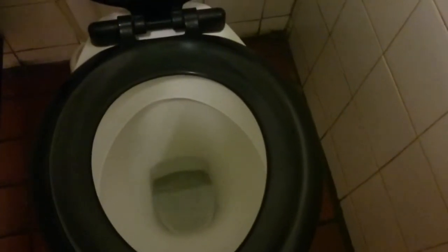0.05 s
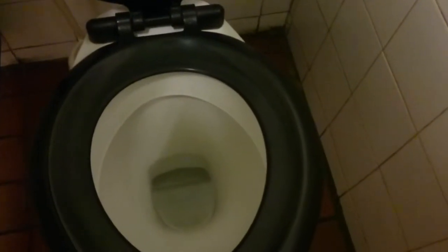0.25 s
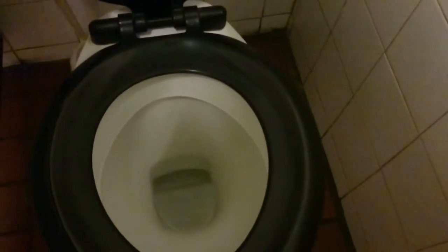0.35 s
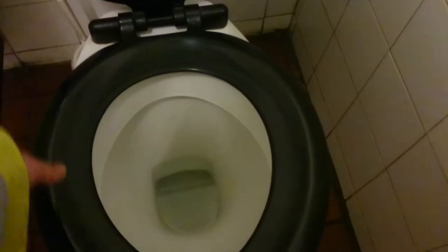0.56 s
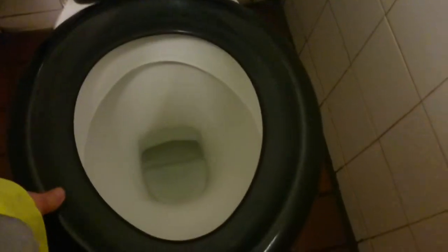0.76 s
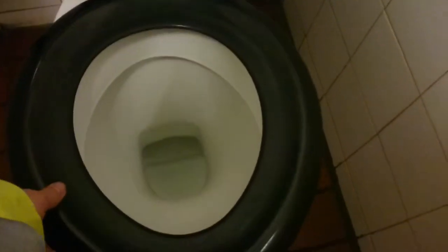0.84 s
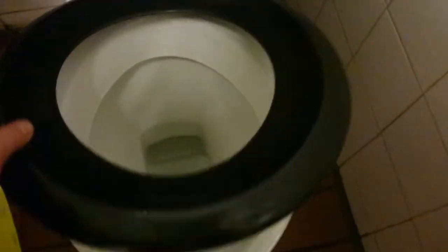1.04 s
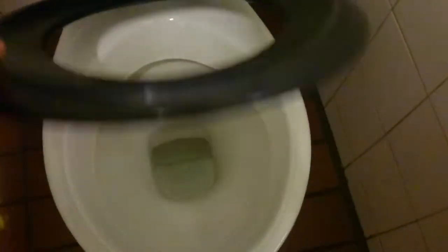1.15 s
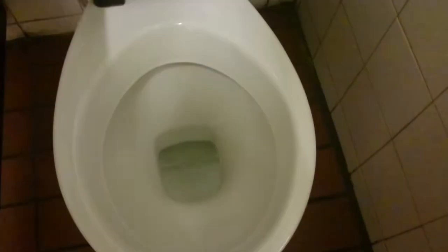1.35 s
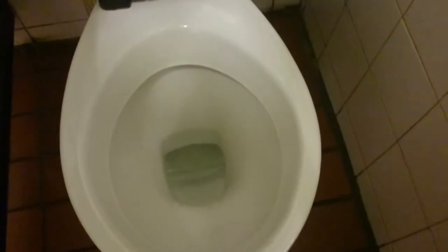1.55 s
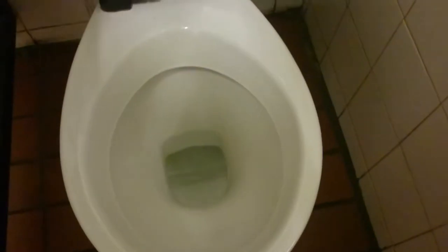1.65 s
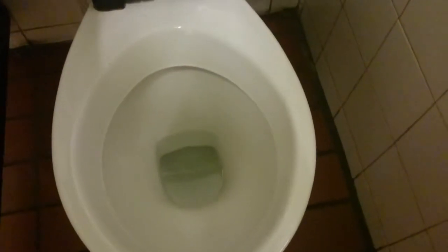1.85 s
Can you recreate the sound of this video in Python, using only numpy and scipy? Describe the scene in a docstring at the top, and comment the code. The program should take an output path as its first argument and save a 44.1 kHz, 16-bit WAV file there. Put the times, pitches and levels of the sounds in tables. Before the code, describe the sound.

A plastic toilet lid gives a hard, bright clack at about 0.2 seconds, ringing the hollow bowl and echoing off tiles for half a second. A hand bumps the seat dully near 0.6. The hinges click just before the seat knocks, softer and duller, at 1.0. Soft close taps come around 1.5 seconds. A jacket sleeve swishes faintly throughout, over quiet room noise and low rumble.

```python
"""A raised plastic toilet lid is knocked, then the seat knocks against its stop, in a small tiled bathroom.
Each knock is a hard clack that rings the plastic and the hollow bowl; the tiles answer for half a second.
The hand bumps the seat, the hinges click, a few soft taps sit up close and a jacket sleeve swishes with
the arm, over faint room tone and rumble. It is all heard through two microphone ports with different
resonances and opposite polarity."""
import sys
import numpy as np
from scipy import signal
from scipy.fft import rfft, irfft, next_fast_len
from scipy.io import wavfile
from scipy.ndimage import map_coordinates

SR = 44100
rng = np.random.default_rng(int(sys.argv[2]) if len(sys.argv) > 2 else 0)


def wav_record(signal):
    """Record a signal, one row per channel, as 16-bit PCM in the file named by sys.argv[1]."""
    frames = np.transpose(np.atleast_2d(signal))
    bounded = np.clip(frames, -1, 1)
    # unit amplitude maps onto the largest positive 16-bit level
    quanta = np.round(bounded * 32767).astype(np.int16)
    wavfile.write(sys.argv[1], SR, quanta)


N = 83790
T = np.arange(N) / SR


# lid hit, then seat hit: t/s, clack/dB, crack/dB, plastic ring/dB, bowl ring/dB,
# clack tilt/dB per octave, attack/s, pan/dB, factor on the plastic's ring time
KNOCK_HITS = [(.2446, 0, 3, -4.5, 1, -0.5, 0.0024, 1, 0.82),
              (1.0054, -9, -22.5, -7, -7, -1.8, 0.0021, -0.5, 0.24)]
# EQ of the clack, before each hit's tilt: f/Hz, level/dB
CLACK_EQ = [(60, -37.5), (200, -21.5), (600, -11.5), (1500, -11), (2600, -6), (3400, 0.5), (5000, 2),
            (6800, -2), (8500, -6.5), (12000, -17.5), (15500, -24.5)]
# EQ of the bright crack at full contact: f/Hz, level/dB
CRACK_EQ = [(500, -51), (2500, -6), (4000, -2), (5500, 4), (7000, 1.5), (9000, -1.5), (11500, -10),
            (15500, -18)]
CLACK_T60_S, TILT_PIVOT_HZ = 0.038, 3900
CRACK_DELAY_S, CRACK_T60_S = 0.0014, 0.012

def knocks():
    """Knocks on lid and seat: a clack and a crack that ring the plastic, the bowl and the tiles."""
    out = np.zeros((2, N))
    for start, clack_db, crack_db, plastic_db, bowl_db, tilt, attack, pan_db, sustain in KNOCK_HITS:
        t = since(start)
        tilted_eq = [(hz, db + tilt * np.log2(hz / TILT_PIVOT_HZ)) for hz, db in CLACK_EQ]
        clack = amp(clack_db) * equalise(diffuse_noise() * envelope(t, CLACK_T60_S, attack), tilted_eq)
        crack_envelope = envelope(since(start + CRACK_DELAY_S), CRACK_T60_S, attack / 2)
        crack = amp(crack_db) * equalise(diffuse_noise() * crack_envelope, CRACK_EQ)
        hit = clack + crack + amp(plastic_db) * plastic(t, sustain) + amp(bowl_db) * bowl(t)
        out += pan(pan_db) * hit + pan(db=-1) * tiles(hit)
    return out


# bright modes of the plastic: f/Hz, level/dB, t60/s before the sustain factor
PLASTIC_MODES = [(2862, -31.5, 0.57), (3230, -29, 0.093), (3500, -19.5, 0.13), (3515, -16, 0.031),
                 (3944, -23.5, 0.23), (4060, -33.5, 0.28), (4300, -28, 0.12), (4060, -44, .12),
                 (4524, -41, 0.04), (4660, -23, .2), (5070, -29, .11), (5235, -24, .06), (5440, -19, 0.065),
                 (6000, -42, 0.15)]

def plastic(t, sustain):
    """The struck plastic rings high and wide, with its own phases at each port."""
    modes = [(hz, db, t60 * sustain) for hz, db, t60 in PLASTIC_MODES]
    return np.array([ring(modes, t, attack=0.00072) for port in range(2)])


# modes of the bowl and its hollow: f/Hz, level/dB, t60/s
BOWL_MODES = [(240.6, -37, 0.099), (358, -34.5, 0.11), (440.6, -26, 0.071), (472.7, -25.5, 0.12),
              (607, -34.5, 0.099), (729.7, -25.5, 0.095), (923, -29, 0.076), (1022, -20, 0.039),
              (1039.4, -27.5, 0.077), (1358, -20.5, 0.052), (1426, -26.5, 0.078), (1770, -23, 0.052),
              (1838, -17, 0.048), (2305, -27.5, 0.083)]
BOWL_ATTACK_S, BOWL_WIDTH_DB = 0.0047, -10.5

def bowl(t):
    """The hollow ring of the bowl, nearly alike at both ports."""
    mid = ring(BOWL_MODES, t, BOWL_ATTACK_S)
    side = amp(BOWL_WIDTH_DB) * ring(BOWL_MODES, t, BOWL_ATTACK_S)
    return np.array([mid + side, mid - side])


# hinge cues: t/s, click/dB, bowl ring/dB, attack/s
HINGE_HITS = [(0.9397, -29, -32, 0.002), (0.9741, -19.5, -16, 0.00063)]
# EQ of a thin hinge click: f/Hz, level/dB
HINGE_EQ = [(80, -33), (150, -20), (240, -2), (600, -18.5), (1200, -8.5), (1800, -4), (2300, -12),
            (2950, 3), (3600, -10), (4500, -5.5), (5300, -7), (6300, -6), (8500, -5), (12000, -8.5),
            (15500, -14)]
HINGE_T60_S = 0.048

def hinges():
    """The hinges take up their play just before the seat lands; the clicks pass on to the bowl."""
    out = np.zeros((2, N))
    for start, click_db, bowl_db, attack in HINGE_HITS:
        t = since(start)
        click = equalise(diffuse_noise() * envelope(t, HINGE_T60_S, attack), HINGE_EQ)
        out += amp(click_db) * click + amp(bowl_db) * bowl(t)
    return out + tiles(out)


# close taps: t/s, level/dB, tick relative to the tap/dB, pan/dB
TAP_HITS = [(.0495, -39, -28, -4), (.089, -48.5, -4, 25.5), (1.5222, -24.5, -9, 4.5), (1.5598, -35, 3, 3),
            (1.669, -46.5, -16, 18), (1.769, -49.5, -13, -4)]
# dead body of a tap: f/Hz, level/dB, t60/s
TAP_BODY_MODES = [(562, -21, 0.04), (994, -6, 0.015), (1250, -5.5, 0.007), (2080, -14, 0.0087)]
# EQ of the tick on top: f/Hz, level/dB
TICK_EQ = [(200, -34), (900, -2), (1800, 4), (3300, 8), (4500, -11), (9000, 6), (15000, -9)]
TAP_ATTACK_S, TICK_T60_S, TAP_LAG_S, TAP_REVERB_DB = 0.0001, 0.015, 0.00033, -5.5

def taps():
    """Soft, dead taps: a few damped cycles and a tick, reaching the left port first."""
    out = np.zeros((2, N))
    for start, tap_db, tick_db, pan_db in TAP_HITS:
        t = np.array([since(start), since(start + TAP_LAG_S)])
        body = sum(amp(db) * envelope(t, t60, TAP_ATTACK_S) * np.sin(2 * np.pi * hz * t)
                   for hz, db, t60 in TAP_BODY_MODES)
        burst = envelope(t, TICK_T60_S, TAP_ATTACK_S) * rng.standard_normal((2, N))
        tick = amp(tick_db) * equalise(burst, TICK_EQ)
        out += amp(tap_db) * pan(pan_db) * (body + tick)
    return out + amp(TAP_REVERB_DB) * tiles(out)


# bass-heavy EQ of the hand's bump: f/Hz, level/dB
GRIP_EQ = [(40, -6), (120, -2), (300, -4), (600, -28.5), (2000, -33)]
GRIP_START_S, GRIP_DB = 0.566, -29

def grip():
    """The hand meets the seat with a dull bump."""
    burst = rng.standard_normal((2, N)) * envelope(since(GRIP_START_S), t60=0.097, attack=0.0016)
    return amp(GRIP_DB) * equalise(burst, GRIP_EQ)


# fader and pan moves of the sleeve: t/s, level/dB, pan/dB
SLEEVE_MOVES = [(0, -50, 3), (.035, -49.5, 4.5), (.13, -55, 5.5), (.23, -60.5, 13), (.45, -46.5, -1),
                (.57, -42.5, 6), (.67, -41.5, 5.5), (.78, -46.5, -0.5), (.9, -53.5, -1.5),
                (1.02, -48.5, 12), (1.14, -44, 4), (1.23, -49, -1.5), (1.329, -44, 1), (1.422, -42, 3.5),
                (1.5, -39, 5.5), (1.6, -43.5, 3), (1.71, -52, 2.5), (1.9, -53.5, 2.5)]
# airy EQ of the cloth: f/Hz, level/dB
CLOTH_EQ = [(100, -23), (400, -7.5), (1000, -4.5), (2500, -3), (4500, 0), (9000, 0.5), (15500, 3.5)]
CATCHES_PER_S, CATCH_DB = 500, -7.5

def sleeve():
    """Jacket cloth slides over itself: a hiss with tiny catches of the weave."""
    times, levels, pans = np.transpose(SLEEVE_MOVES)
    level_db = np.interp(T, times, levels) + 0.8 * wobble(per_s=22)
    pan_db = np.outer([0.5, -0.5], np.interp(T, times, pans))
    chance = CATCHES_PER_S / SR
    catches = (rng.random(N) < chance) * rng.standard_normal((2, N)) / np.sqrt(chance)
    friction = diffuse_noise() + amp(CATCH_DB) * catches
    return amp(level_db + pan_db) * equalise(friction, CLOTH_EQ)


# reverb time of the tiled room: f/Hz, t60/s
TAIL_T60 = [(150, 1), (450, 0.61), (1000, 0.61), (2800, 0.7), (4200, 0.72), (7000, 0.59), (14000, 0.51)]
# EQ of the reverb tail: f/Hz, level/dB
TAIL_EQ = [(150, 3.5), (500, -2.5), (1500, -3.5), (3500, -0.5), (6000, -3), (12000, -9.5)]
PREDELAY_S, EARLY_DB, TAIL_ATTACK_S = 0.005, -2, 0.017

def tiles(x):
    """The tiled walls answer x with a flurry of near reflections, then a bright tail."""
    t = since(PREDELAY_S)
    early = diffuse_noise() * envelope(t, t60=0.15, attack=0.001)
    hz, frame_times, spectra = signal.stft(diffuse_noise(), SR, nperseg=256)
    t60 = along(TAIL_T60, hz)[:, None]
    unit_energy = np.sqrt(2 * np.log(1000) / (t60 * SR))
    decay = unit_energy * np.exp(-np.log(1000) * frame_times / t60)
    tail = signal.istft(spectra * decay, SR, nperseg=256)[1][:, :N]
    tail *= 1 - np.exp(-t / TAIL_ATTACK_S)
    impulse_response = amp(EARLY_DB) * early / np.linalg.norm(early[0]) + equalise(tail, TAIL_EQ)
    return signal.fftconvolve(x, impulse_response, axes=1)[:, :N]


# fader moves of the rumble: t/s, level/dB
RUMBLE_MOVES = [(0, -4.5), (.3, 0), (.62, 3), (.7, 7.5), (.77, 3.5), (.9, -10), (1.15, 2.5), (1.58, -2.5),
                (1.665, 3), (1.73, -6), (1.785, -0.5), (1.9, -1)]
# EQ of the rumble: f/Hz, level/dB
RUMBLE_EQ = [(20, -74), (45, -53), (70, -50), (110, -56), (200, -78.5), (600, -110)]

def rumble():
    """An uneven low rumble on the moving ports, heavier on the left."""
    swell_db = np.interp(T, *np.transpose(RUMBLE_MOVES)) + 2.1 * wobble(per_s=10)
    return pan(db=10) * amp(swell_db) * equalise(rng.standard_normal((2, N)), RUMBLE_EQ)


# EQ of the room tone: f/Hz, level/dB
ROOM_TONE_EQ = [(25, -51), (100, -59), (300, -50.5), (1000, -52.5), (3000, -56), (8000, -58), (15500, -54)]

def room_tone():
    """A faint, steady bed of room noise."""
    return equalise(diffuse_noise(), ROOM_TONE_EQ)


# likeness of the sound field at the two ports: f/Hz, coherence/0..1
PORT_COHERENCE = [(100, 0.9), (400, 0.85), (900, 0.25), (2000, 0.17), (5000, 0.25), (15000, 0.057)]

def diffuse_noise():
    """White noise from all sides: narrow in the bass, wide in the treble."""
    def mid_side_gains(hz):
        angle = np.arccos(along(PORT_COHERENCE, hz)) / 2
        return np.array([np.cos(angle), np.sin(angle)])
    mid, side = filtered(rng.standard_normal((2, N)), mid_side_gains)
    return np.array([mid + side, mid - side])


def ring(modes, t, attack, wander_rad=0.55):
    """Damped modes whose phases wander randomly, so the ring sounds rough rather than pure."""
    out = np.zeros(N)
    for hz, db, t60 in modes:
        phase = 2 * np.pi * rng.random() + wander_rad * wobble(per_s=90)
        out += amp(db) * envelope(t, t60, attack) * np.sin(2 * np.pi * hz * t + phase)
    return out


def envelope(t, t60, attack):
    """A quick rise times a decay of 60 dB per t60; all times in seconds."""
    return np.exp(-np.log(1000) * t / t60) * (1 - np.exp(-t / attack))


def since(start):
    """Seconds since start, zero before it."""
    return np.maximum(T - start, 0)


def wobble(per_s):
    """A smooth random curve with per_s knots a second."""
    return map_coordinates(rng.standard_normal(1024), [T * per_s], mode="wrap")


def amp(db):
    """Decibels to gain."""
    return 10 ** (np.asarray(db) / 20)


def pan(db):
    """Stereo gains that put the left db above the right."""
    return amp(np.array([[db], [-db]]) / 2)


def along(points, hz):
    """Read (f/Hz, value) points at hz on a log axis."""
    frequencies, values = np.transpose(points)
    return np.interp(np.log(hz + 1), np.log(frequencies + 1), values)


def filtered(x, response):
    """Multiply the spectrum of x by response(hz)."""
    size = 2 * next_fast_len(N)
    hz = np.fft.rfftfreq(size, 1 / SR)
    return irfft(rfft(x, size) * response(hz), size)[..., :N]


def equalise(x, curve):
    """Minimum-phase EQ through (f/Hz, level/dB) points."""
    def response(hz):
        cepstrum = irfft(np.log(amp(along(curve, hz))))
        half = len(cepstrum) // 2
        cepstrum[1:half] *= 2  # folded onto positive time: no pre-ring
        cepstrum[half + 1:] = 0
        return np.exp(rfft(cepstrum))
    return filtered(x, response)


def scene():
    """The mix that reaches the microphone, from the knocks down to the room tone."""
    return knocks() + hinges() + taps() + grip() + sleeve() + rumble() + room_tone()


# resonances of the left microphone port: f/Hz, level/dB
LEFT_PORT_EQ = [(60, 2), (250, -5.5), (1000, -4), (2000, -8.5), (2900, -7.5), (4000, -4.5), (5200, -5),
                (6000, 7.5), (7200, -1), (8700, 1), (10500, -5), (12500, -12), (15500, -34)]
# resonances of the right microphone port: f/Hz, level/dB
RIGHT_PORT_EQ = [(60, 2), (1000, -0.5), (2700, 1.5), (3400, 3.5), (4000, 7.5), (4600, 4.5), (5300, -2),
                 (6200, -5.5), (8500, -10), (10200, -6), (12000, -4.5), (15500, -10.5)]
RIGHT_LAG_S, HIGH_CUT_HZ = 0.00008, 15950

def record(dry):
    """Each port colours its channel, the right one inverted and slightly late; a high cut follows."""
    right = -filtered(dry[1], lambda hz: np.exp(-2j * np.pi * hz * RIGHT_LAG_S))
    ports = np.array([equalise(dry[0], LEFT_PORT_EQ), equalise(right, RIGHT_PORT_EQ)])
    return filtered(ports, lambda hz: hz < HIGH_CUT_HZ)


dry = scene()
out = record(dry)
wav_record(out)
```